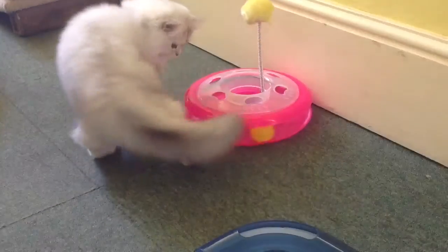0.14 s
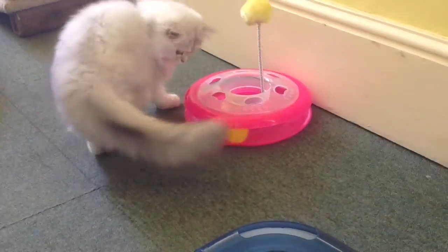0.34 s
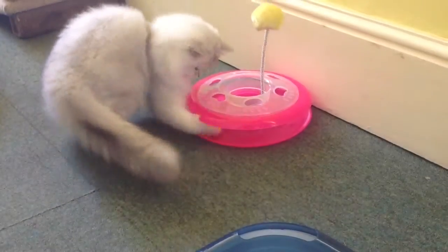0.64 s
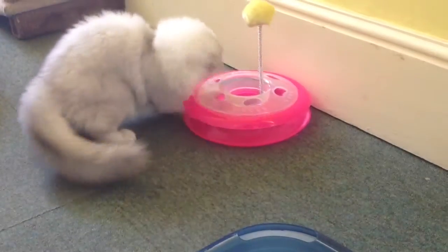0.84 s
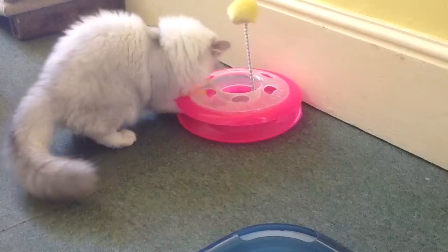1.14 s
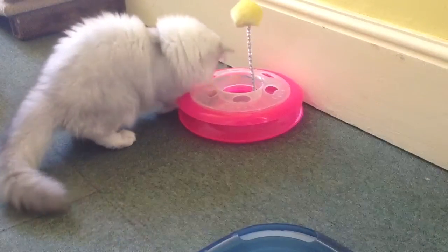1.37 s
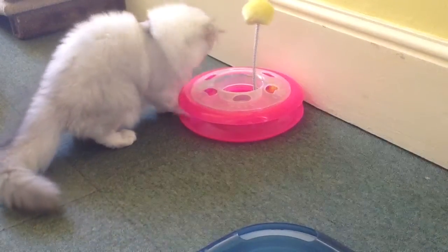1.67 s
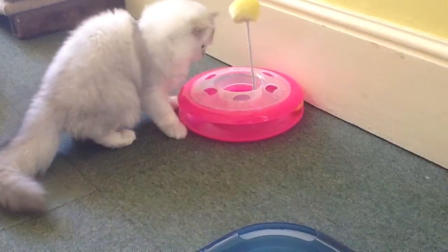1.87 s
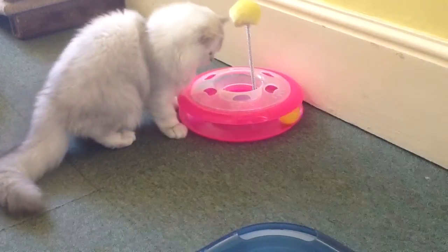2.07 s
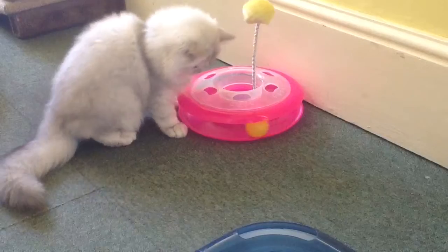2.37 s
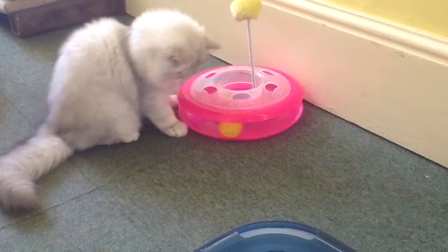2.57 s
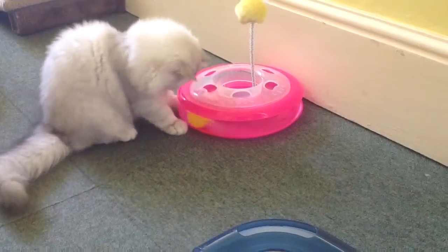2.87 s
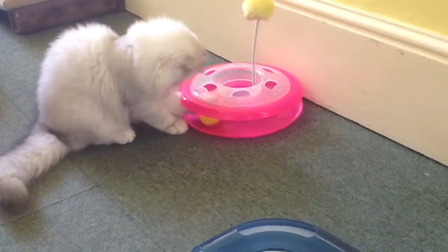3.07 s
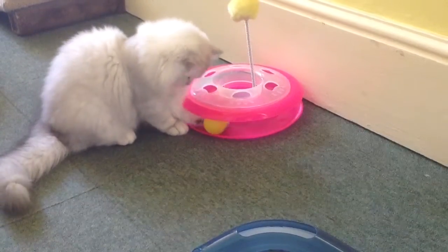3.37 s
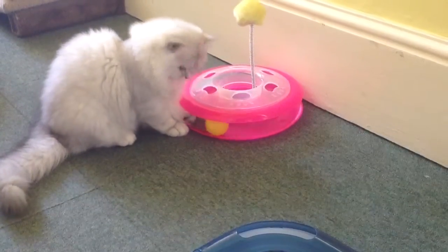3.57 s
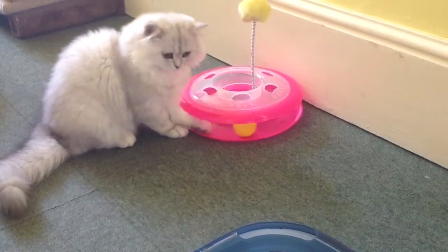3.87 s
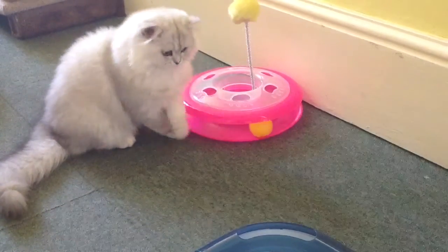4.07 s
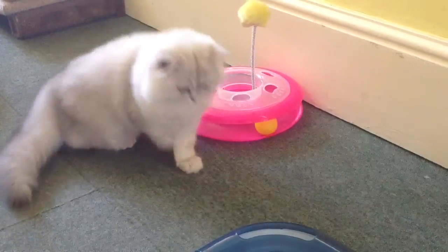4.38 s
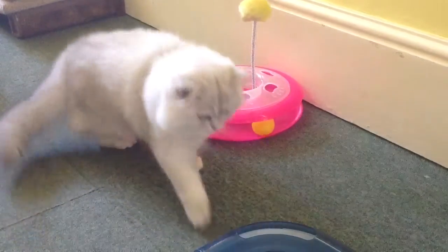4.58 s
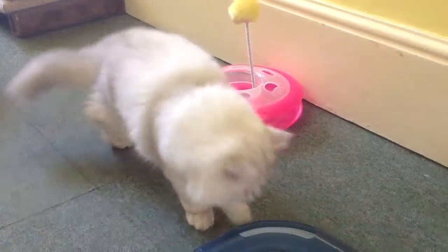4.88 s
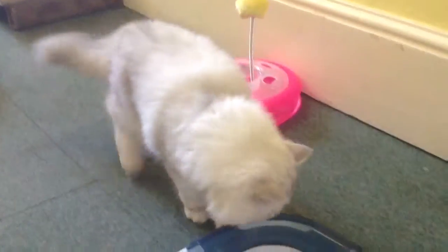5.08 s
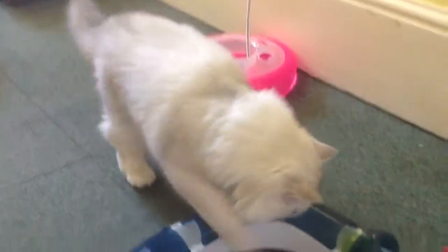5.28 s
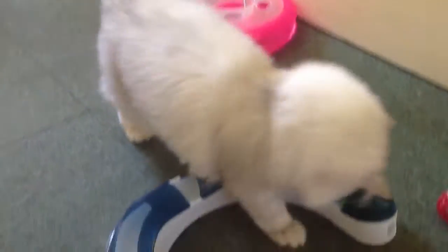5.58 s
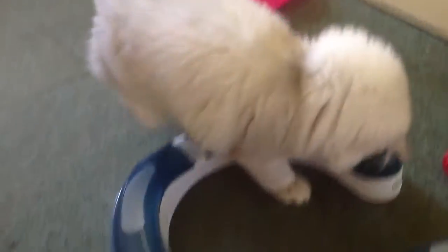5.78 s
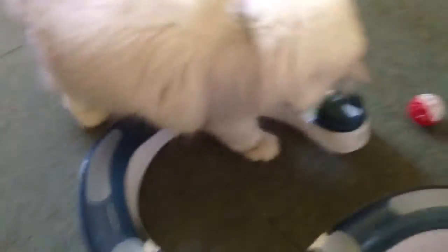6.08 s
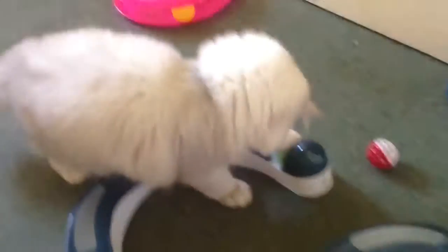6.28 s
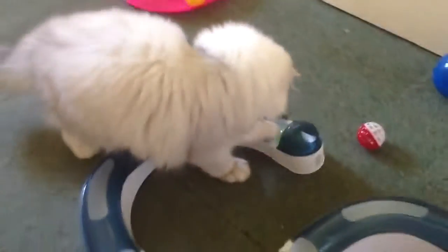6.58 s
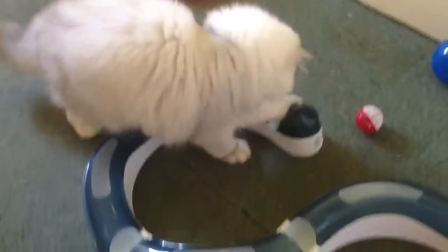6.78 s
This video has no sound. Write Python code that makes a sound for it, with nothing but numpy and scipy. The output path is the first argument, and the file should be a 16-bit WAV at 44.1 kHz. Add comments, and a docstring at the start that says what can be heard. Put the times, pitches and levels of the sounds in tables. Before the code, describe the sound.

A kitten bats a ball around a hollow plastic track toy, with bursts of clacking and a light rolling rattle in a quiet room.

```python
"""A small, live room with a carpet, where a kitten bats a ball round a hollow plastic track toy.
The toy skids in a stick-slip rasp; the ball clacks against the shell, ringing its modes, and rolls
on over tiny bumps with a fine rattle and a wavering hollow note. Then fur brushes along a second,
harder track and the kitten paws at that. The phone is bumped once; room air murmurs throughout."""
import sys
import numpy as np
from scipy import signal
from scipy.fft import rfft, irfft, next_fast_len
from scipy.io import wavfile

SR = 44100
rng = np.random.default_rng(int(sys.argv[2]) if len(sys.argv) > 2 else 0)


def master(y):
    """Save y as 16-bit WAV."""
    cut = np.clip(np.atleast_2d(y).T, -1, 1)
    pcm = np.round(cut * 32767)  # scale
    wavfile.write(sys.argv[1], SR, pcm.astype(np.int16))


N = 305613
TIME = np.arange(N) / SR
RING = TIME[:SR * 3 // 4]  # time axis of one hit and its tail

# runs of the ball in the round toy: start t/s, end t/s, starting level/dB, slowing/(dB per s)
ROUND_ROLLS = [(0, 0.69, -62.5, 7), (0.84, 1.16, -43, 73.5), (1.29, 1.42, -47, 60), (1.49, 1.77, -50, 20.5),
               (1.8, 2.98, -57, 5.5), (3.06, 3.28, -45.5, 6), (3.6, 3.85, -68.5, 7),
               (3.92, 4.08, -63.5, 49)]


def amp(db):
    """Decibels to gain."""
    return 10 ** (np.asarray(db) / 20)


def unit(x):
    """x at rms 1."""
    return x / np.sqrt(np.mean(x ** 2) + 1e-20)


def along(points, hz):
    """A curve of (f/Hz, value) points, read on a log frequency axis."""
    f, v = np.transpose(points)
    return np.interp(np.log(hz + 1), np.log(f + 1), v)


def filtered(x, gain):
    """x through the EQ curve gain(hz)."""
    size = next_fast_len(len(x) + 8192)
    return irfft(rfft(x, size) * gain(np.fft.rfftfreq(size, 1 / SR)), size)[:len(x)]


def coloured(x, spectrum, tilt_db=0, knee_hz=3000):
    """x shaped by a (f/Hz, level/dB) curve, tilted by tilt_db per octave above the knee, at rms 1."""
    curve = lambda hz: amp(along(spectrum, hz) + tilt_db * np.log2(np.maximum(hz / knee_hz, 1)))
    return unit(filtered(x, curve))


def add(track, s, sound):
    """Mix a sound into the track at s seconds."""
    rest = track[max(round(s * SR), 0):]
    rest[:len(sound)] += sound[:len(rest)]


def grains(rate, spread_db):
    """Tiny impacts of uneven size at random moments, about rate a second."""
    return (rng.random(N) < rate / SR) * rng.choice([-1, 1], N) * amp(spread_db * rng.random(N))


def fade(t60):
    """Decay of 60 dB in t60 seconds."""
    return amp(-60 * RING / t60)


def gate(start, end, edge_s):
    """1 from start to end, with soft edges."""
    return (np.tanh((TIME - start) / edge_s) - np.tanh((TIME - end) / edge_s)) / 2


def strokes(rows, edge_s):
    """Envelope of rubbing strokes, each held at its own level."""
    return sum(amp(db) * gate(start, end, edge_s) for start, end, db in rows)


def background():
    """The bed: a low murmur of room air under the microphone's hiss."""
    # colour of the room tone: f/Hz, level/dB
    air = [(25, 3), (50, -15), (85, 2.5), (130, 0.5), (175, 8), (215, 7), (300, 2), (370, -1.5), (450, -3),
           (800, -7), (2000, -11), (5500, -12.5), (9000, -12.5), (15500, -15.5)]
    return amp(-62) * coloured(rng.standard_normal(N), air)


def room_tail(build_s=0.0046):
    """The room's answer at energy 1: it builds quickly and hangs on longest in the bass."""
    # reverb time of the room: f/Hz, t60/s
    decay_times = [(150, 1), (400, 0.26), (1000, 0.52), (3000, 0.43), (7000, 0.45), (14000, 0.24)]
    hz, t, noise = signal.stft(rng.standard_normal(len(RING)), SR, nperseg=256)
    decay = amp(-60 * t / along(decay_times, hz)[:, None])
    tail = signal.istft(noise * decay, SR)[1][:len(RING)]
    tail *= 1 - np.exp(-(RING / build_s) ** 2)
    return tail / np.linalg.norm(tail)


def in_room(x, wet_db):
    """x plus its reverb, at wet_db relative to the dry sound."""
    reverb = unit(signal.fftconvolve(x, room_tail())[:len(x)])
    return x + amp(wet_db) * np.std(x) * reverb


def shell(modes):
    """One ring of a plastic shell; each mode's sign is random, standing for the point of contact."""
    hz, db, t60 = np.transpose(modes)[:, :, None]
    strength = amp(db) * rng.choice([-1, 1], hz.shape)
    return (strength * fade(t60) * np.sin(2 * np.pi * hz * RING)).sum(0) / np.linalg.norm(strength)


def boom(rise_s=0.009):
    """A knock slowly wakes the low resonances."""
    # low modes of the hollow toys and the room: f/Hz, level/dB, t60/s
    low_modes = [(169.4, -9, 0.6), (193, -8.5, 0.44), (213.2, 0, 0.45), (235.4, -0.5, 0.18),
                 (262.3, -3.5, 0.31), (296, -8, 0.24), (334.1, -9, 0.6)]
    return shell(low_modes) * (1 - np.exp(-RING / rise_s))


def coasting(runs, edge_s=0.01954):
    """Envelope of a rolling ball: it sets off, friction slows it steadily, then it is checked."""
    return sum(amp(db - slowing * np.maximum(TIME - start, 0)) * gate(start, end, edge_s)
               for start, end, db, slowing in runs)


def rolling(runs, modes, rate, spread_db, damping_t60, tick_db, grit_db,
            rumble_db, rumble_growth, wet_db):
    """The ball trips over small bumps; its weight damps the shell, so they tick rather than ring."""
    # colour of the rolling grit: f/Hz, level/dB
    grit_colour = [(100, -22), (400, 7), (620, 4), (900, -2.5), (1200, -9.5), (2000, -8.5), (2800, -10),
                   (4500, -16.5), (15000, -19)]
    speed = coasting(runs)
    over_bumps = lambda ring: unit(signal.fftconvolve(grains(rate, spread_db), ring)[:N])
    ticks = amp(tick_db) * over_bumps(shell(modes) * fade(damping_t60))
    grit = amp(grit_db) * coloured(grains(rate, spread_db), grit_colour)
    # the low end swells far less with speed than the rattle does
    rumble = amp(rumble_db) * unit(speed ** rumble_growth * over_bumps(boom() * fade(0.15)))
    return in_room(speed * (ticks + grit), wet_db) + rumble


def hollow_note(slow_hz=620, fast_hz=850, fast_db=-53, width_hz=40, gain_db=-5):
    """The rolling ball keeps a narrow, wavering resonance of the channel alive, higher at speed."""
    speed = coasting(ROUND_ROLLS)
    hz = slow_hz + (fast_hz - slow_hz) * np.tanh((speed / amp(fast_db)) ** 2)
    phase = 2 * np.pi * np.cumsum(hz) / SR
    waver = lambda: unit(filtered(rng.standard_normal(N), lambda f: 1 / (1 + (f / width_hz) ** 2)))
    note = unit(waver() * np.cos(phase) + waver() * np.sin(phase))
    return speed * amp(gain_db) * note


def struck_at(modes, pitch_hz, hardness_db, favour_db, width_octaves=0.21):
    """Mode balance of one blow: hard contact lifts the highs, the spot struck those near its pitch."""
    hz, db, t60 = np.transpose(modes)
    octaves = np.log2(hz / pitch_hz)
    favoured = favour_db * np.exp(-(octaves / width_octaves) ** 2)
    return np.transpose([hz, db + hardness_db * octaves + favoured, t60])


def contact(softness_db, hard_rise_s=0.00022, doubling_db=9):
    """Attack of a blow: one with little crack for its knock is soft and starts the shell gradually."""
    rise_s = hard_rise_s * 2 ** (np.clip(softness_db, 0, 20) / doubling_db)
    return 1 - np.exp(-RING / rise_s)


def thump(push_s=0.0014):
    """The blow shoves the whole toy against the carpet: one brief low push."""
    u = RING / push_s
    return u * (2 - u) * np.exp(-u)


def strikes(hits, modes, colour, hardness_db, favour_db, ring_db, ring_wet_db, thump_db,
            crack_db, crack_t60, crack_wet_db, boom_db):
    """Each blow layers the shell's ring on a low push, a sharp crack and a lingering boom."""
    track = np.zeros(N)
    for s, knock, pitch, crack, tilt, low in hits:
        ring = shell(struck_at(modes, pitch, hardness_db, favour_db)) * contact(knock - crack)
        body = in_room(ring, ring_wet_db) + amp(thump_db) * thump()
        add(track, s, amp(knock + ring_db) * body)
        snap = fade(crack_t60) * coloured(rng.standard_normal(len(RING)), colour, tilt)
        # so short a crack comes back from the walls as a smooth hiss of its own colour
        wash = amp(crack_wet_db) * np.std(snap) * coloured(room_tail(), colour, tilt)
        add(track, s, amp(crack + crack_db) * (snap + wash))
        add(track, s, amp(low + boom_db) * boom())
    return track


def round_toy(nudge_hz=950, nudge_crack_db=-8.5, nudge_tilt_db=-4.5, nudge_boom_db=-13):
    """The ball clacks and rolls in the round toy; light nudges give a smaller, higher tick."""
    # modes of the hollow shell: f/Hz, level/dB, t60/s
    modes = [(363, -9.5, 0.098), (517, -4.5, 0.057), (552, -0.5, 0.068), (618, -5.5, 0.11),
             (680, -1.5, 0.042), (773, -3.5, 0.068), (852, -3.5, 0.038), (908, -4, 0.044),
             (1030, -8, 0.046), (1145, -8.5, 0.031), (1225, -6, 0.026), (1352, -7, 0.032),
             (1472, -16, 0.079), (1692, -15, 0.052), (1913, -10, 0.021), (2336, -15, 0.038),
             (2790, -16.5, 0.02), (3300, -17, 0.012)]
    # colour of the contact crack: f/Hz, level/dB
    crack_colour = [(100, -30), (420, -1), (650, 11), (1400, 0), (2000, 3), (3500, 4), (6000, -0.5),
                    (9000, -5), (13000, -4.5), (16000, -18)]
    # paw and ball slamming the toy, levels before the mix trims:
    # t/s, knock level/dB, favoured f/Hz, crack level/dB, crack tilt/(dB per octave), boom level/dB
    hits = [(0.6856, -25.5, 516, -35, -5, -49.5), (0.707, -31, 1330, -42, -2, -54),
            (0.7214, -34, 550, -35.5, -3, -56), (0.7464, -40, 806, -35.5, -0.5, -61),
            (0.8192, -24.5, 654, -38, -2, -55), (0.8518, -31, 870, -48, 0, -47),
            (0.8593, -29, 375, -28, 3, -53.5), (0.869, -42, 1300, -52, -2, -51),
            (0.8823, -32, 684, -56, -4, -44.5), (1.1744, -39.5, 750, -37.5, -2, -55.5),
            (1.2591, -42.5, 520, -41, 5, -63), (1.303, -38, 730, -44, -5, -55),
            (1.4781, -36.5, 920, -41.5, -3.5, -86), (3.0453, -26.5, 760, -34.5, 2, -50),
            (3.093, -30.5, 670, -37, -2.5, -66), (3.1111, -34, 820, -47, 2, -53),
            (3.1986, -33.5, 860, -33, 4, -49), (3.2141, -56, 650, -36, 0.5, -44.5),
            (3.5975, -35.5, 1040, -43.5, 0.5, -51)]
    # the loose ball nudging the channel wall, and near 4.92 s a paw landing softly on the carpet: t/s, knock
    # level/dB before its trim
    nudges = [(0.1447, -46.5), (0.1729, -55), (0.2956, -55.5), (0.391, -60.5), (0.5841, -50),
              (0.614, -50.5), (1.5569, -47), (1.6658, -43), (1.694, -44), (1.833, -47), (1.9512, -45),
              (2.0511, -50.5), (2.1968, -49.5), (2.344, -42.5), (2.658, -52.5), (2.7242, -48.5),
              (2.7612, -46.5), (3.8719, -56), (3.9238, -54.5), (4.115, -50.5), (4.578, -60.5),
              (4.9221, -52.5), (4.9333, -49.5)]
    clacks = strikes(hits, modes, crack_colour, hardness_db=5.5, favour_db=7.5,
                     ring_db=5, ring_wet_db=-0.5, thump_db=-14.5,
                     crack_db=6.5, crack_t60=0.014, crack_wet_db=4, boom_db=13.5)
    light_hits = [(s, db, nudge_hz, db + nudge_crack_db, nudge_tilt_db, db + nudge_boom_db)
                  for s, db in nudges]
    ticks = strikes(light_hits, modes, crack_colour, hardness_db=5.5, favour_db=4,
                    ring_db=6, ring_wet_db=-1.5, thump_db=-9,
                    crack_db=4.5, crack_t60=0.014, crack_wet_db=3.5, boom_db=10)
    roll = rolling(ROUND_ROLLS, modes, rate=130, spread_db=24.5, damping_t60=0.018,
                   tick_db=-4, grit_db=-7, rumble_db=-64, rumble_growth=0.26, wet_db=0.5)
    return clacks + ticks + roll


def skids():
    """Shoved plastic sticks and slips in a dense rasp."""
    # the toy sliding under a paw: start t/s, end t/s, level/dB
    shoves = [(0.658, 0.711, -40.5), (1.206, 1.275, -52.5), (1.399, 1.473, -53.5), (3.018, 3.055, -42),
              (3.177, 3.189, -38)]
    # colour of the rasp: f/Hz, level/dB
    colour = [(150, -11), (500, -10), (900, 0.5), (1500, 2.5), (2000, -3.5), (3400, 0.5), (4700, -7),
              (6000, -3), (10000, -8.5), (15000, -9)]
    rasp = coloured(grains(rate=12000, spread_db=-4), colour)
    return in_room(strokes(shoves, edge_s=0.0078) * rasp, wet_db=-3.5)


def fur_brush():
    """Fur slides over the plastic with a soft hiss."""
    # passes along the hard track: start t/s, end t/s, level/dB
    passes = [(5.32, 6.9, -66), (5.87, 6.08, -53), (6.17, 6.25, -59)]
    # colour of the hiss: f/Hz, level/dB
    colour = [(100, 5), (600, 13.5), (1500, 10), (3000, 5.5), (7000, 2.5), (12000, 2), (16000, -6)]
    return strokes(passes, edge_s=0.051) * coloured(grains(rate=13000, spread_db=15), colour)


def phone_bump(s=5.5045, hz=240, db=-39, length_s=0.0081, tick_db=-10):
    """A finger nudges the phone: a tick and two low cycles, bone dry."""
    tick_colour = [(700, -3.5), (2500, -13), (15000, -22)]  # f/Hz, level/dB
    track = np.zeros(N)
    thud = np.sin(np.pi * np.minimum(RING / length_s, 1)) * np.sin(2 * np.pi * hz * RING)
    tick = fade(0.062) * coloured(rng.standard_normal(len(RING)), tick_colour)
    add(track, s, amp(db) * (thud + amp(tick_db) * tick))
    return track


def hard_track():
    """The second track is stiffer and nearer: higher modes, less room."""
    # modes of the stiff shell: f/Hz, level/dB, t60/s
    modes = [(485, -4.5, 0.064), (568, -7, 0.084), (688, 1, 0.046), (950, 8.5, 0.018), (1180, 3.5, 0.026),
             (1350, 3.5, 0.042), (1482, 2, 0.048), (1620, 2.5, 0.032), (1880, -2, 0.048), (1697, -4, 0.036),
             (2100, -2.5, 0.052), (2770, -10, 0.037), (3540, -22, 0.053)]
    # colour of the contact crack: f/Hz, level/dB
    crack_colour = [(100, -55), (600, 0.5), (1300, 4.5), (1900, -1), (2400, 0), (3600, 3), (5000, -6.5),
                    (6400, -8.5), (7400, -20), (12000, -21), (16000, -29)]
    # ball and paw striking the track, levels before the mix trims:
    # t/s, knock level/dB, favoured f/Hz, crack level/dB, crack tilt/(dB per octave), boom level/dB
    hits = [(5.7205, -39, 486, -46, -3, -54.5), (5.9433, -40.5, 626, -52, -1, -62),
            (6.3308, -44, 505, -72, -3, -65), (6.4412, -30, 1830, -33, 0, -50.5),
            (6.6427, -46.5, 1360, -55, -8, -62), (6.7598, -46.5, 1430, -47.5, -3, -59),
            (6.7715, -43.5, 530, -48, 1.5, -62), (6.8896, -55, 1290, -70, -1, -66)]
    # runs of the ball: start t/s, end t/s, starting level/dB, slowing/(dB per s)
    runs = [(5.74, 5.9, -56, 55), (5.92, 6.09, -51.5, 26), (6.33, 7, -61, 0.5)]
    clacks = strikes(hits, modes, crack_colour, hardness_db=0.5, favour_db=12,
                     ring_db=8, ring_wet_db=-2.5, thump_db=-17,
                     crack_db=5, crack_t60=0.043, crack_wet_db=-1.5, boom_db=7.5)
    roll = rolling(runs, modes, rate=250, spread_db=5, damping_t60=0.0064,
                   tick_db=-2, grit_db=-4, rumble_db=-71.5, rumble_growth=0.089, wet_db=-7.5)
    return clacks + roll


def scene():
    """Both toys and the room, heard at one microphone."""
    first_toy = round_toy() + hollow_note() + skids()
    second_toy = hard_track() + fur_brush()
    return (first_toy + second_toy + phone_bump() + background())[None]


def record(dry, low_cut_hz=150, top_hz=15630):
    """The phone's microphone thins the bass and keeps nothing above its band limit."""
    thin = signal.sosfilt(signal.butter(2, low_cut_hz, "highpass", fs=SR, output="sos"), dry)
    return np.array([filtered(x, lambda hz: hz < top_hz) for x in thin])


dry = scene()
out = record(dry)
master(out)
```